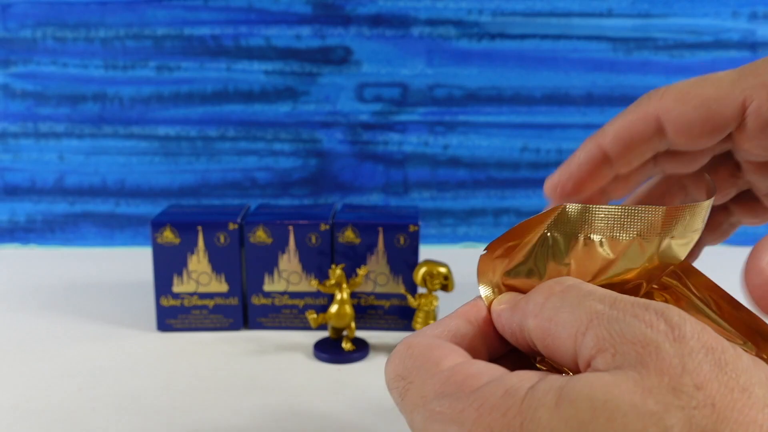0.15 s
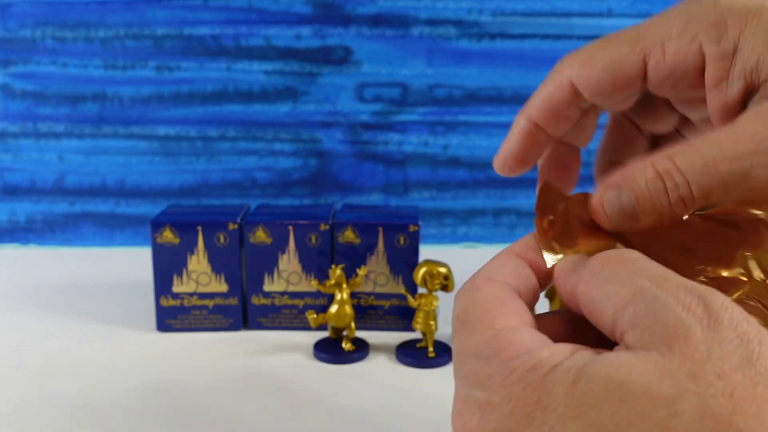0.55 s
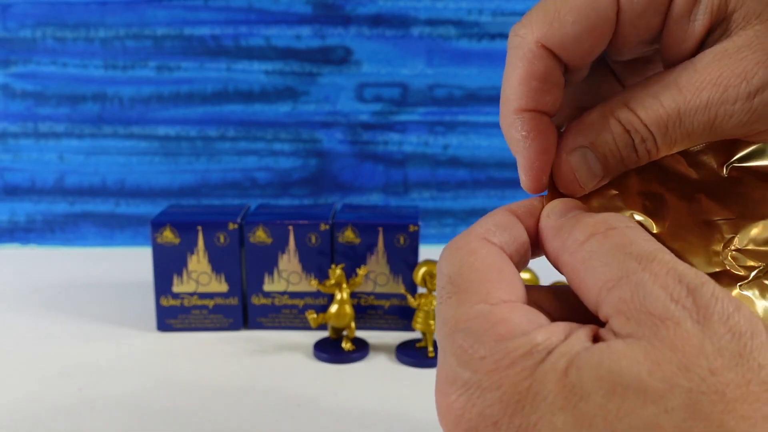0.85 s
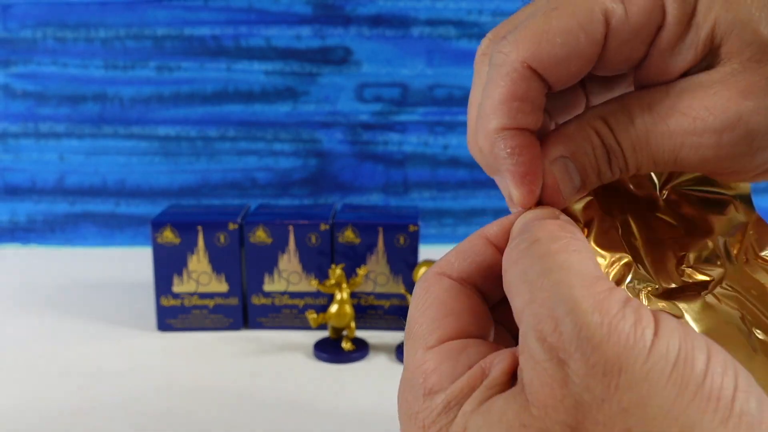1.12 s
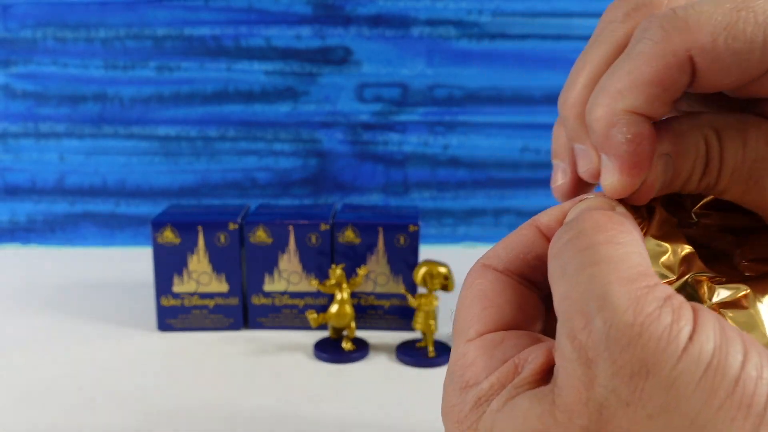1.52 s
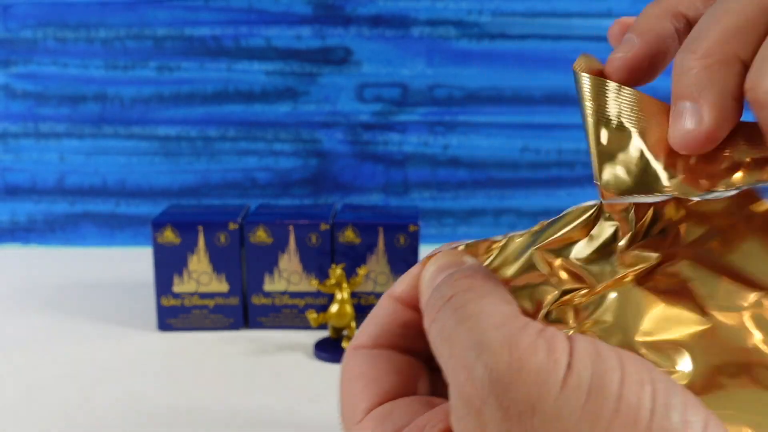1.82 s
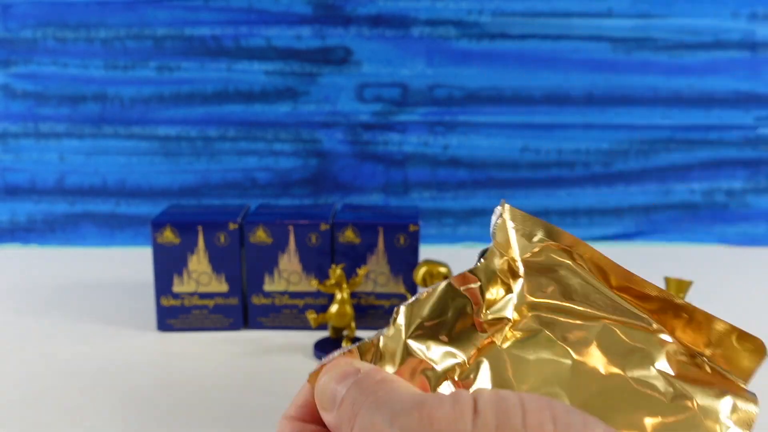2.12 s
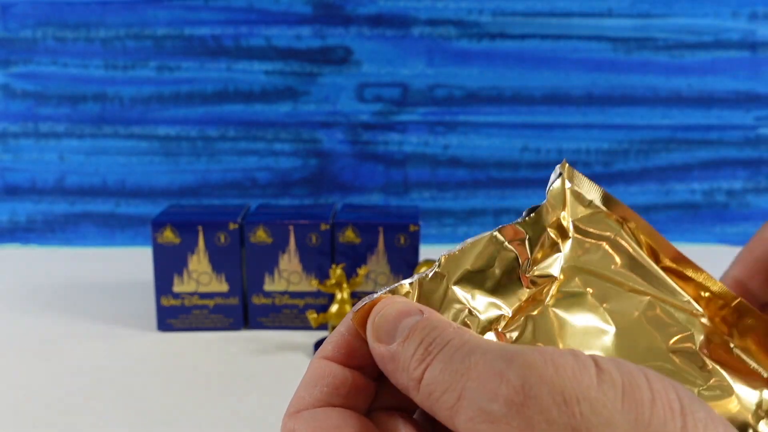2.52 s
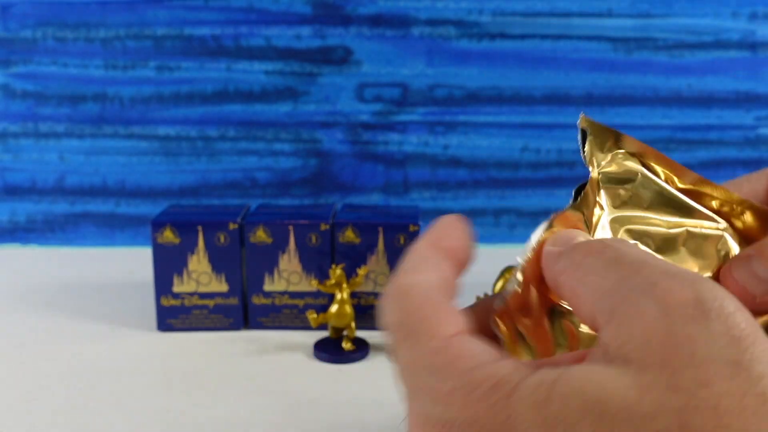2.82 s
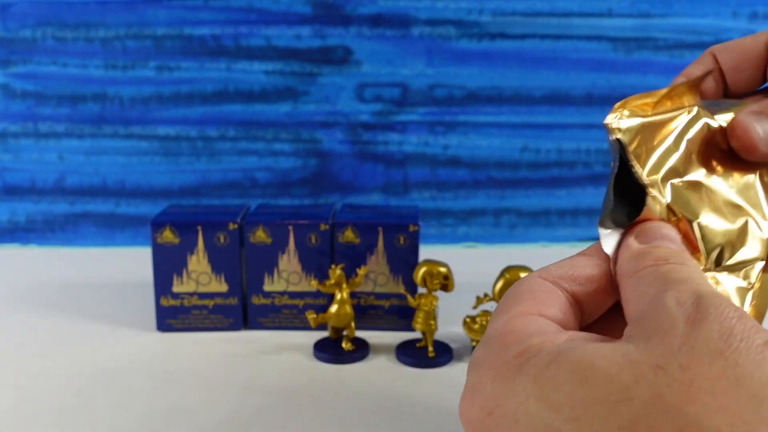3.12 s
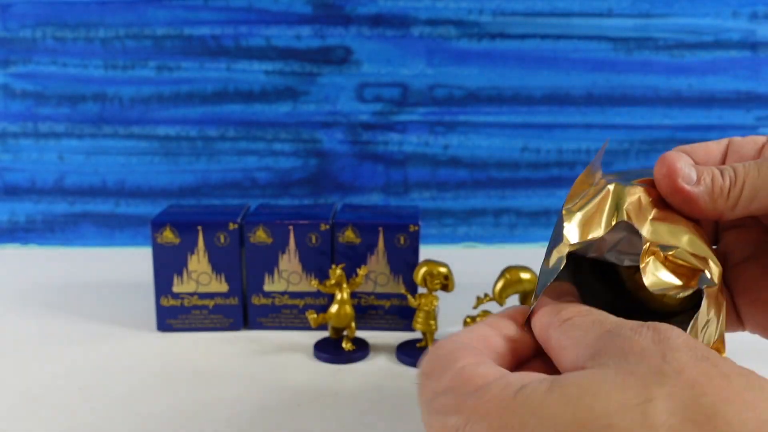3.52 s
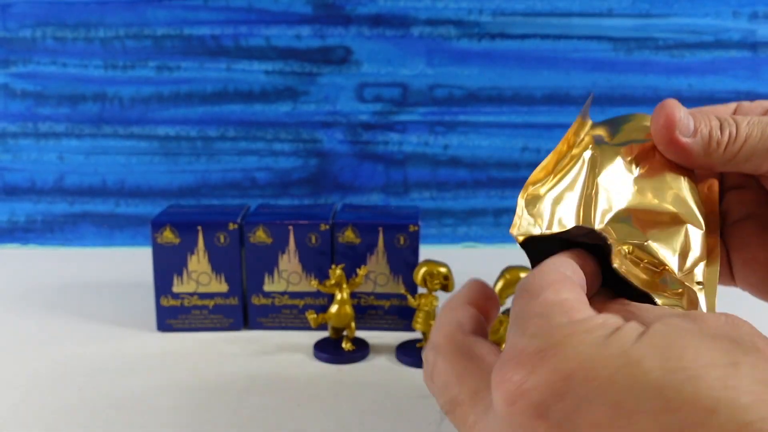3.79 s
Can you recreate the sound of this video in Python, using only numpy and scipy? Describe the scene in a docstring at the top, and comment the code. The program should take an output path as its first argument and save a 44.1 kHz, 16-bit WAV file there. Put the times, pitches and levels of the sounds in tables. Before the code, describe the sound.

A foil pouch crinkles close up in a small, quiet room. A dull table thud opens, then sharp crackles cluster at 0.2-0.6 s and thin out. Scattered snaps from 1.1 s build into a loud, bright tearing flurry at 1.7-2.15 s. A near lull follows, with faint finger drags and an isolated crackle around 2.75 s. Dense crisp crumpling resumes from 3.1 s to the end.

```python
"""Foil pouch torn open

Hands crumple and tear open a foil pouch, close up in a small room. Creases snap as noise bursts with
a ringing facet; shaped noise gives crackle and rustle between them, and bands of it the finger drags.
Decaying sine modes make the table top thud when touched. A short noise echo and a quiet floor lie behind."""
import sys
import numpy as np
from scipy import signal
from scipy.fft import rfft, irfft
from scipy.io import wavfile
from scipy.ndimage import uniform_filter1d

SR = 44100
rng = np.random.default_rng(int(sys.argv[2]) if len(sys.argv) > 2 else 0)


def waveform_to_disk(signal):
    """Save audio, clipped to [-1, 1], as 16-bit WAV at the path in sys.argv[1]."""
    frames = np.transpose(np.atleast_2d(signal))
    scaled = np.clip(frames, -1, 1) * 32767
    samples = np.round(scaled).astype(np.int16)
    wavfile.write(sys.argv[1], SR, samples)


def attenuation_scalar(level_db):
    """Turn a level in dB into a linear amplitude multiplier (20 dB per decade)."""
    decades = np.asarray(level_db, float) / 20
    return 10 ** decades


N = 174195


def curve(points, hz):
    """Reads (f/Hz, value) points on a log-frequency axis."""
    p = np.array(points, float)
    return np.interp(np.log(hz + 1), np.log(p[:, 0]), p[:, 1])


def colour(x, points):
    """Filters the last axis by (f/Hz, gain/dB) points."""
    n = x.shape[-1]
    return irfft(rfft(x) * attenuation_scalar(curve(points, np.arange(n // 2 + 1) * SR / n)), n)


def bandpass(x, low_hz, high_hz, order):
    """Butterworth band-pass along the last axis."""
    sos = signal.butter(order, [low_hz, high_hz], "bandpass", fs=SR, output="sos")
    return signal.sosfilt(sos, x)


def unit(x):
    """Scales to rms 1."""
    return x / np.sqrt(np.mean(x ** 2))


def decay(t, t60_s):
    """Falls 60 dB in t60_s."""
    return np.exp(-np.log(1000) * t / t60_s)


def thirds(x):
    """Splits the last axis into lows, mids and treble, crossing near 1.5 and 7 kHz."""
    n = x.shape[-1]
    octave = np.log2(np.arange(n // 2 + 1) * SR / n + 1)
    low = 1 / (1 + np.exp(4 * (octave - 10.55)))
    high = 1 / (1 + np.exp(-5 * (octave - 12.77)))
    return [irfft(rfft(x) * gain, n) for gain in (low, 1 - low - high, high)]


def stereo(mid, side):
    """Left is mid plus side, right is mid minus side."""
    return mid + side * np.array([[1], [-1]])


def snaps():
    """A crease snapping over is a steep noise burst plus a facet ring; colour and place differ."""
    # creases: t/s, mids level/dB, lows level/dB, treble level/dB, facet ring f/Hz
    creases = [(0.0097, -19.5, -21.5, -19.5, 2210), (0.0238, -24, -25, -46, 1880),
               (0.1334, -38, -67, -61, 4600), (0.195, -14, -39, -23.5, 3470), (0.2879, -38, -49, -64, 2180),
               (0.3182, -13, -57, -21.5, 4200), (0.3327, -15, -48, -30, 3720),
               (0.3353, -19.5, -42, -37, 3320), (0.3542, -14.5, -25.5, -22, 3100),
               (0.3768, -29, -22, -16, 1750), (0.385, -15, -21, -12, 2400), (0.3924, -14.5, -26, -24, 4930),
               (0.3996, -13, -41, -17, 3420), (0.4041, -14, -26, -21, 2800), (0.4098, -14, -33, -21, 3900),
               (0.422, -17.5, -33, -30, 2230), (0.4306, -15, -29, -26, 1800),
               (0.4573, -16.5, -24.5, -14.5, 1430), (0.4825, -35, -60, -50, 4000),
               (0.5014, -20, -36, -36, 3520), (0.5467, -26, -40, -53, 3550), (0.5551, -24, -35, -35, 3300),
               (0.5835, -23, -36.5, -25.5, 1500), (0.629, -38.5, -55, -49, 5000),
               (0.6818, -43, -43, -63, 1400), (0.7083, -18.5, -32, -14, 3010),
               (0.7201, -26, -43, -37, 1720), (0.727, -33, -42, -48, 1500),
               (0.779, -40.5, -43.5, -57, 1500), (1.0754, -20, -32.5, -17, 7950),
               (1.0808, -20.5, -43, -42, 2160), (1.117, -21.5, -29.5, -50, 1710),
               (1.132, -24, -42.5, -41, 3050), (1.166, -21.5, -33.5, -14.5, 6000),
               (1.174, -17.5, -32, -17.5, 4000), (1.2609, -16, -29.5, -39, 3140),
               (1.2956, -11, -24.5, -17.5, 1930), (1.3088, -16, -42, -49, 2190),
               (1.3485, -20, -36, -39, 2110), (1.5268, -38, -49, -45, 1900),
               (1.5713, -22, -71, -20.5, 6860), (1.6909, -12, -43, -18, 5540), (1.718, -28, -35, -26, 6800),
               (1.7484, -18, -30, -26, 3200), (1.7634, -11.5, -22.5, -21, 1510),
               (1.793, -13.5, -46, -24, 5800), (1.8046, -17, -51, -31, 1700),
               (1.8184, -12, -56, -17.5, 4270), (1.8383, -19.5, -56, -23, 5100),
               (1.8668, -18.5, -35.5, -20, 1870), (1.8837, -13, -25.5, -9.5, 3780),
               (1.8918, -15.5, -25.5, -13, 3020), (1.922, -13.5, -20, -15, 3180),
               (1.9277, -17, -32, -19, 3030), (1.9355, -15, -46, -13, 6560),
               (1.9383, -13.5, -46, -13, 4150), (1.9522, -30, -31, -21, 7200),
               (1.9602, -19, -47, -17, 2600), (1.9835, -21, -30.5, -28, 2400), (2, -15, -32.5, -12, 3280),
               (2.0421, -14, -22, -25, 1730), (2.0495, -15, -26.5, -22, 3450), (2.054, -20, -41, -11, 2950),
               (2.074, -25, -53, -26, 6750), (2.0905, -13.5, -18.5, -20, 1800),
               (2.103, -22, -27, -26, 6330), (2.1185, -12.5, -22, -20, 2200), (2.129, -8, -18, -22, 2370),
               (2.2983, -40.5, -65, -46, 3060), (2.426, -24, -30.5, -30.5, 2770),
               (2.6212, -35.5, -48, -60, 2700), (2.6345, -50, -43, -39, 2000), (2.669, -40, -47, -55, 2530),
               (2.6886, -31, -38.5, -33, 2400), (2.6952, -26.5, -44, -47, 2230),
               (2.764, -14.5, -29, -26, 1840), (2.792, -30, -40, -30, 4400), (2.815, -29, -29, -57, 1600),
               (2.9228, -30.5, -51, -57, 2020), (2.9425, -45, -39.5, -50, 1800),
               (3.0882, -16.5, -30.5, -27, 2590), (3.1177, -27.5, -38.5, -39, 2820),
               (3.194, -22.5, -43, -44, 3970), (3.2004, -21.5, -37, -33, 3850),
               (3.2115, -18.5, -34.5, -37, 4950), (3.2371, -14.5, -33.5, -22, 4320),
               (3.256, -10, -38, -22.5, 3120), (3.269, -19.5, -53, -27, 6960),
               (3.3181, -13.5, -36, -29, 2600), (3.3259, -12, -35, -21.5, 3170),
               (3.3395, -16.5, -39, -37, 3180), (3.3635, -11, -29, -17, 2400),
               (3.3746, -13, -42, -32, 5100), (3.3852, -10.5, -49, -16.5, 7100),
               (3.4205, -15, -37, -42, 2220), (3.4256, -14, -38, -23.5, 3130),
               (3.4383, -14.5, -36.5, -25, 3260), (3.486, -22.5, -51, -26.5, 2900),
               (3.5002, -19.5, -39, -40, 1770), (3.5248, -19.5, -38, -42, 4300),
               (3.542, -11.5, -20.5, -30, 2950), (3.564, -16, -24, -49, 1470),
               (3.5706, -23, -26, -42, 1400), (3.5781, -12, -50, -21, 2900),
               (3.5946, -13.5, -33, -12.5, 1820), (3.6023, -16, -45, -20, 3800),
               (3.6157, -19, -36, -30, 1600), (3.6777, -13, -24, -17, 2100), (3.7013, -21, -56, -43, 2020),
               (3.7255, -20.5, -31, -58, 2070), (3.8277, -21.5, -45, -37, 2260),
               (3.8722, -18, -35, -46, 2300), (3.8845, -16.5, -28, -20.5, 2870),
               (3.9162, -12.5, -27.5, -16, 5450), (3.9448, -19, -29, -49, 2340)]
    # treble colour of a burst: f/Hz, gain/dB
    treble_colour = [(9000, 5.5), (16000, -2.5)]
    rise_s, low_t60_s, high_t60_s = 0.0002, 0.021, 0.0047
    bass_hz, full_hz, bass_db = 148, 674, -29.5  # lows thin out from full_hz down to bass_hz
    facet_cycles = 29.6  # ring periods to fall 60 dB
    facet_span, facet_fall_db = 1.71, -11  # mids gain at this ratio off the ring
    tone_db = -6  # sine ring against facet noise
    pan_db, lag_s = 1, 0.00001  # standard deviations between the two sides
    size, lead = 2048, 128  # samples
    t = np.maximum(np.arange(size) - lead, 0) / SR
    side = np.array([[.5], [-.5]])
    out = np.zeros((2, N + size))
    for s, mid_db, low_db, high_db, hz in creases:
        noise = rng.standard_normal(size)
        pan, lag = rng.standard_normal(2)
        struck = noise * (1 - np.exp(-t / rise_s))
        facet_decay = decay(t, facet_cycles / hz)

        low = thirds(struck * decay(t, low_t60_s))[0]
        low = colour(low, [(bass_hz / 4, 2 * bass_db), (bass_hz, bass_db), (full_hz, 0)])

        mid = thirds(struck * facet_decay)[1]
        mid = colour(mid, [(hz / facet_span, facet_fall_db), (hz, 0), (hz * facet_span, facet_fall_db)])
        tone = thirds(np.sin(2 * np.pi * hz * t) * facet_decay)[1]
        mid = unit(mid) + attenuation_scalar(tone_db) * unit(tone)

        high = colour(thirds(struck * decay(t, high_t60_s))[2], treble_colour)

        burst = 0
        for part, db, span in ((low, low_db, 130), (mid, mid_db, 40), (high, high_db, 40)):
            # level = highest rms over span samples
            peak_rms = np.sqrt(uniform_filter1d(part ** 2, size=span).max())
            burst = burst + attenuation_scalar(db) * part / peak_rms
        panned = burst * attenuation_scalar(pan_db * pan * side)
        shifted = np.gradient(burst) * SR * lag_s * lag * side  # slope times delay: a tiny time shift
        i = max(int(s * SR) - lead, 0)
        out[:, i:i + size] += panned + shifted
    return out[:, :N]


def crackle():
    """Tiny creases of very uneven size and colour, over the steady rustle of fingers on foil."""
    # working of the foil: t/s, mids level/dB, treble level/dB, lows level/dB
    work = np.array([(0.0, -54, -57, -36), (0.015, -54, -57, -44), (0.102, -57, -63.5, -54),
                     (0.178, -55.5, -64, -60), (0.205, -40, -49, -51), (0.263, -53, -61, -63),
                     (0.31, -57.5, -66, -66), (0.329, -25, -41, -38), (0.388, -24.5, -36.5, -29.5),
                     (0.533, -44, -52, -55), (0.56, -37.5, -37, -32.5), (0.603, -49, -51, -66),
                     (0.636, -42, -44, -45), (0.674, -60, -65, -68), (0.712, -46, -42, -41),
                     (0.8, -57.5, -63, -62), (0.858, -51, -45.5, -52.5), (0.932, -62.5, -70, -64),
                     (1.02, -66.5, -65, -63), (1.051, -50, -58, -59), (1.08, -41.5, -41, -43),
                     (1.153, -47, -58, -52), (1.175, -32, -37, -41.5), (1.242, -50, -52.5, -55.5),
                     (1.284, -45, -54, -43.5), (1.306, -39.5, -53, -45), (1.374, -45.5, -57, -50.5),
                     (1.456, -43.5, -51, -51.5), (1.501, -50.5, -61, -52.5), (1.579, -49.5, -58, -55.5),
                     (1.638, -56, -60, -72), (1.657, -50, -55, -50), (1.695, -31, -32, -35.5),
                     (1.742, -20, -18.5, -23), (1.787, -32, -41, -35), (1.853, -39, -44, -46.5),
                     (1.931, -26, -34.5, -31), (2.023, -40, -36, -44.5), (2.048, -35.5, -44, -29.5),
                     (2.112, -35, -48, -40.5), (2.126, -25.5, -31, -23.5), (2.21, -48.5, -61.5, -50.5),
                     (2.381, -64.5, -55.5, -68), (2.418, -74, -66, -83), (2.432, -50.5, -41, -41.5),
                     (2.516, -64, -69, -70), (2.599, -69, -68, -80), (2.631, -70, -63, -67),
                     (2.691, -40, -46.5, -47), (2.735, -47, -51, -46.5), (2.758, -33, -38, -38),
                     (2.857, -50, -53, -67), (2.909, -56, -58, -70), (2.967, -38, -35.5, -45),
                     (3.014, -51.5, -57, -58), (3.075, -47.5, -49.5, -47), (3.094, -32, -35, -50),
                     (3.142, -46, -51, -49), (3.184, -47, -51, -52), (3.205, -40, -48, -43),
                     (3.3, -36.5, -49, -51), (3.327, -32, -41, -29), (3.372, -31, -32.5, -45),
                     (3.412, -38.5, -44, -46), (3.435, -29.5, -40, -34), (3.475, -42.5, -52, -56),
                     (3.571, -33, -51, -33.5), (3.606, -31, -32, -37.5), (3.713, -42.5, -46, -48),
                     (3.755, -30.5, -39, -32.5), (3.805, -43, -49.5, -48), (3.884, -29.5, -39, -37),
                     (3.949, -39, -47, -40)], float)
    # crackle and rustle spectrum: f/Hz, density/dB per Hz
    spectrum = [(60, -78), (150, -28.5), (350, -13.5), (800, -11.5), (1500, 1), (2800, 3), (4300, 0),
                (8000, -6), (16500, -14.5)]
    grains_per_s, grain_t60_s = 1100, 0.0051
    size_spread_db, colour_spread_db = 7.5, 4  # colour: scatter per half octave
    rustle_db, side_db = 0.5, -49  # rustle against grains, side against mid
    gentle_db, smoothing = -34, 0.19  # below gentle_db rustle gains on grains, dB per dB

    u = rng.random((2, N))
    sizes_db = np.minimum(-np.log(u[1]), 4) * size_spread_db
    sizes = (u[0] < grains_per_s / SR) * attenuation_scalar(sizes_db)
    grain_decay = decay(np.arange(1024) / SR, grain_t60_s)
    grains = 0
    for hz in 90 * 2. ** np.arange(0, 8, .5):
        own_sizes = sizes * attenuation_scalar(colour_spread_db * rng.standard_normal(N))
        envelope = signal.fftconvolve(own_sizes, grain_decay)[:N]
        noise = envelope * rng.standard_normal((2, N))
        grains = grains + bandpass(noise, hz / 2 ** .25, hz * 2 ** .25, 2)

    t = np.arange(N) / SR
    mid_db, high_db, low_db = (np.interp(t, work[:, 0], work[:, k]) for k in (1, 2, 3))
    rustle = attenuation_scalar(rustle_db + smoothing * np.maximum(gentle_db - mid_db, 0))
    mix = (unit(grains) + rustle * rng.standard_normal((2, N))) / np.hypot(1, rustle)
    low, mid, high = (unit(part) for part in thirds(colour(mix, spectrum)))
    centre, side = attenuation_scalar(mid_db) * mid + attenuation_scalar(high_db) * high + attenuation_scalar(low_db) * low
    return stereo(centre, attenuation_scalar(side_db) * side)


def drags():
    """A finger dragged over the pouch mouth: a noise band starts abruptly and fades as it slows."""
    # drags: t/s, length/s, starting level/dB, centre f/Hz
    strokes = [(0.546, 0.3, -43.5, 1270), (2.423, 0.12, -42, 2400), (2.621, 0.06, -40.5, 2500),
               (2.682, 0.092, -36, 2280)]
    span, fade_db = 1.22, -22  # ratio of band edge to centre; fade over one length
    t = np.arange(N) / SR
    out = 0
    for s, length_s, db, hz in strokes:
        band = unit(bandpass(rng.standard_normal(N), hz / span, hz * span, 3))
        progress = (t - s) / length_s
        fade = np.maximum(progress, 0) * np.maximum(progress, 1) ** 2  # steepens after one length
        out = out + band * (t > s) * attenuation_scalar(db + fade_db * fade)
    return out


def table():
    """A soft push sets the modes of the table top ringing, with a dull noise rattle."""
    # touches: t/s, level/dB
    touches = [(.001, -21), (.012, -18.5), (0.022, -27.5), (1.289, -38), (1.887, -31.5), (2.136, -41),
               (2.347, -48.5), (2.435, -37), (2.628, -41.5), (2.672, -42), (3.156, -40.5), (3.902, -33.5)]
    # table top modes: f/Hz, level/dB, t60/s
    modes = [(116, -24.5, 0.27), (174.9, -10, 0.2), (266, -2, 0.075), (315, -8, 0.093),
             (366.5, -3.5, 0.058), (459, -24, 0.16), (617, -2, 0.046), (770, -30, 0.07), (961, -18, 0.25)]
    push_s = 0.0021
    rattle_db, rattle_top_hz, rattle_t60_s = -8.5, 800, 0.18
    t = np.arange(SR // 2) / SR
    ring = 0
    for k, (hz, db, t60_s) in enumerate(modes):
        ring = ring + (-1) ** k * attenuation_scalar(db) * decay(t, t60_s) * np.sin(2 * np.pi * hz * t)
    out = np.zeros(N + len(t))
    for s, db in touches:
        rattle = unit(bandpass(rng.standard_normal(len(t)), modes[1][0], rattle_top_hz, 1))
        thud = ring + attenuation_scalar(rattle_db) * rattle * decay(t, rattle_t60_s)
        i = int(s * SR)
        out[i:i + len(t)] += attenuation_scalar(db) * thud * (1 - np.exp(-t / push_s))
    return out[:N]


def room(x):
    """Diffuse echo: octave bands of decaying noise, lows lasting longest, slightly different each side."""
    # reverberation: f/Hz, t60/s
    reverb = [(200, 0.36), (1400, 0.037), (4000, 0.13), (12000, 0.085)]
    echo_db, side_db, onset_s = -15.5, -17.5, 0.0036
    t = np.arange(SR // 3) / SR
    tail = np.zeros((2, len(t)))
    for hz in 90 * 2. ** np.arange(8):
        noise = rng.standard_normal(tail.shape)
        tail += bandpass(noise, hz / np.sqrt(2), hz * np.sqrt(2), 2) * decay(t, curve(reverb, hz))
    tail *= 1 - np.exp(-(t / onset_s) ** 2)
    tail /= np.sqrt(np.sum(tail ** 2, axis=1, keepdims=True))
    mid, side = signal.fftconvolve(x[None], tail, axes=1)[:, :N]
    return attenuation_scalar(echo_db) * stereo(mid, attenuation_scalar(side_db) * side)


def floor():
    """Quiet air of the room: steady coloured noise, independent in mid and side."""
    # floor spectrum: f/Hz, density/dB per Hz
    spectrum = [(15, -60), (25, -39), (149, -1.5), (317, 0), (714, -1), (1130, -9), (1260, -3), (2050, -13),
                (3430, -15.5), (16000, -35)]
    level_db, side_db = -59, -3.5
    mid, side = (unit(colour(rng.standard_normal(N), spectrum)) for _ in range(2))
    return attenuation_scalar(level_db) * stereo(mid, attenuation_scalar(side_db) * side)


def scene():
    """Pouch and table, their echo and the floor."""
    near = snaps() + crackle() + drags() + table()
    return near + room(near.mean(axis=0)) + floor()


def low_pass(x):
    """Removes everything above the highest recorded frequency."""
    return signal.sosfilt(signal.butter(12, 16830, fs=SR, output="sos"), x)


def record(dry):
    """The microphone rounds the tallest peaks and drops bass and top; the left is a touch weaker."""
    peak, low_hz, top_hz = 0.95, 44, 16100
    left_db = -0.65  # left against right
    x = peak * np.tanh(dry / peak)
    x = signal.sosfilt(signal.butter(2, low_hz, "highpass", fs=SR, output="sos"), x)
    x = signal.sosfilt(signal.ellip(8, .2, 60, top_hz, fs=SR, output="sos"), x)
    mix = x * attenuation_scalar(left_db * np.array([[.5], [-.5]]))
    return low_pass(mix)


dry = scene()
out = record(dry)
waveform_to_disk(out)
```